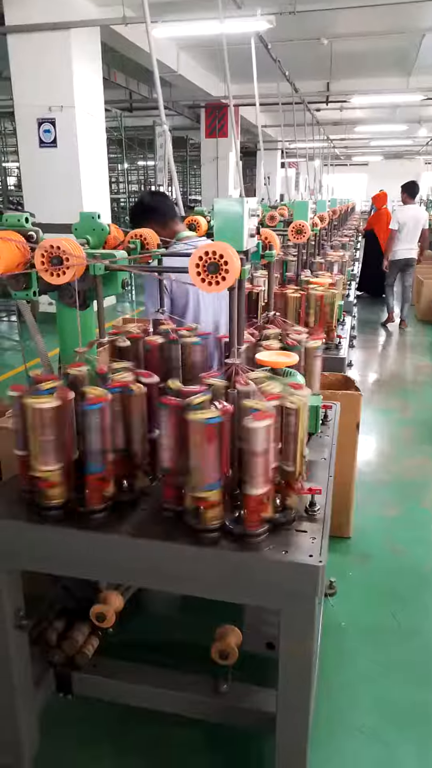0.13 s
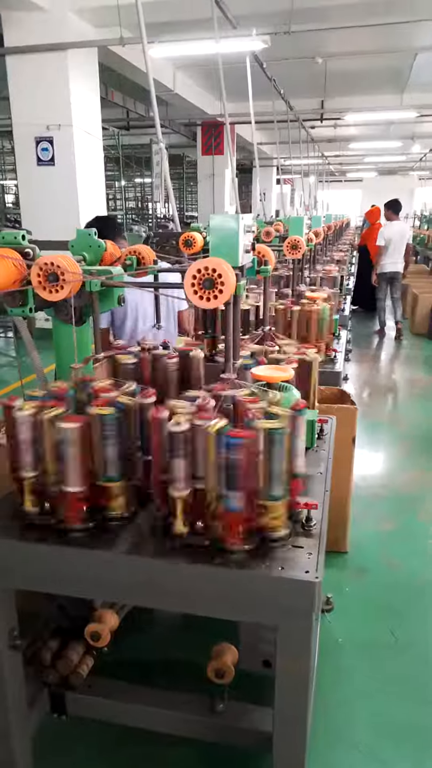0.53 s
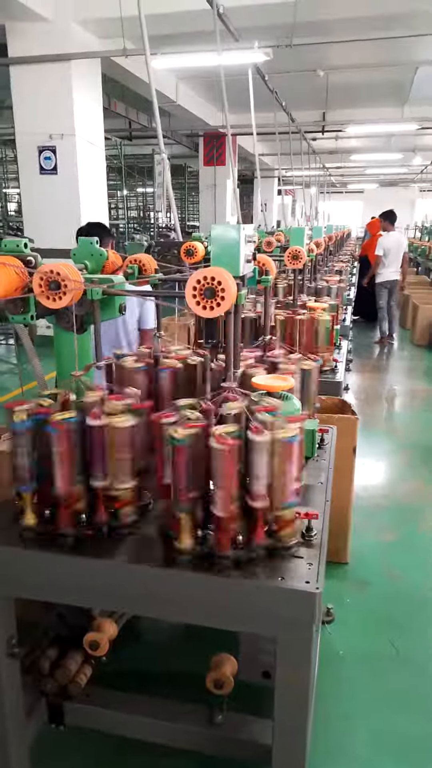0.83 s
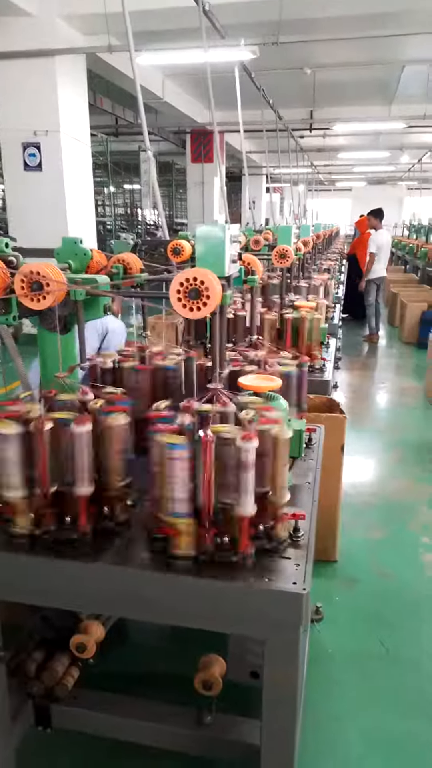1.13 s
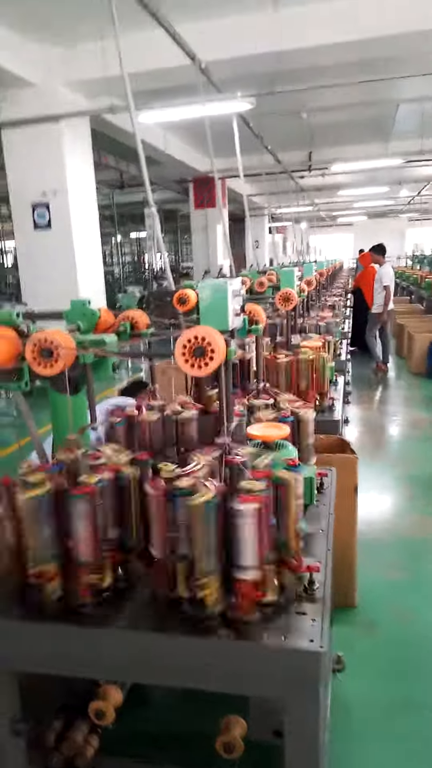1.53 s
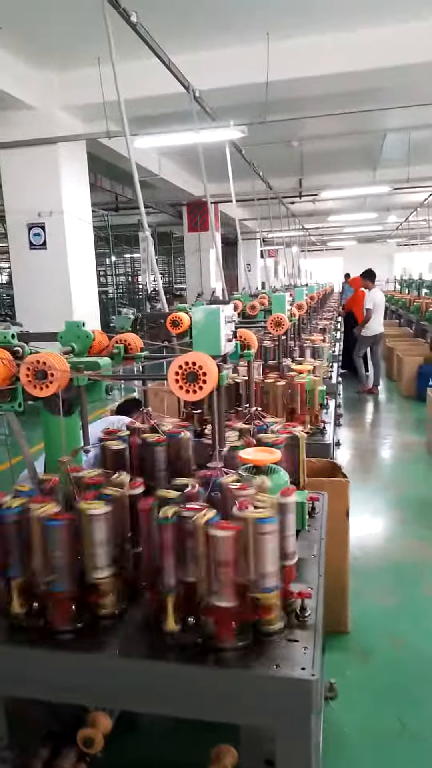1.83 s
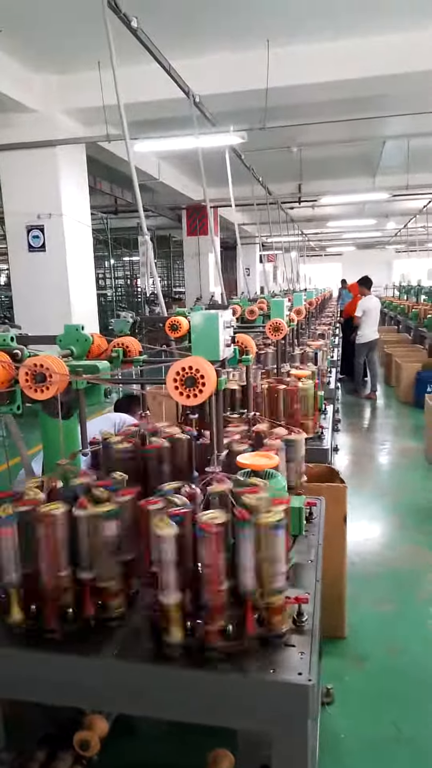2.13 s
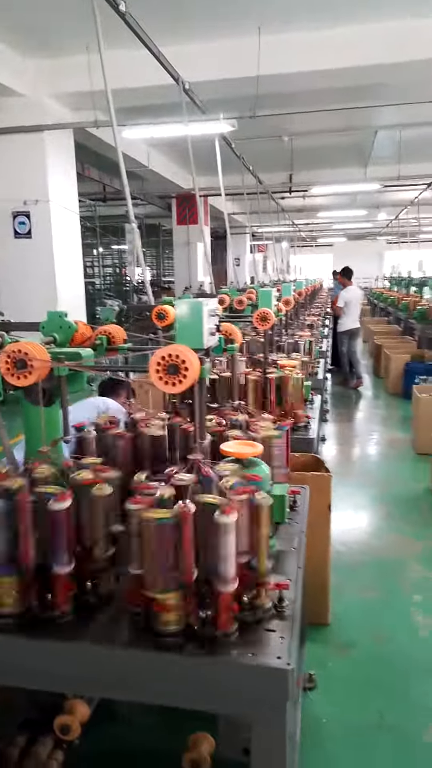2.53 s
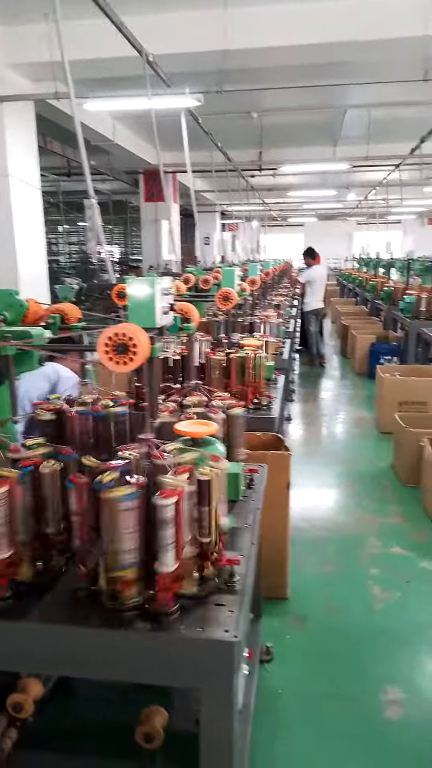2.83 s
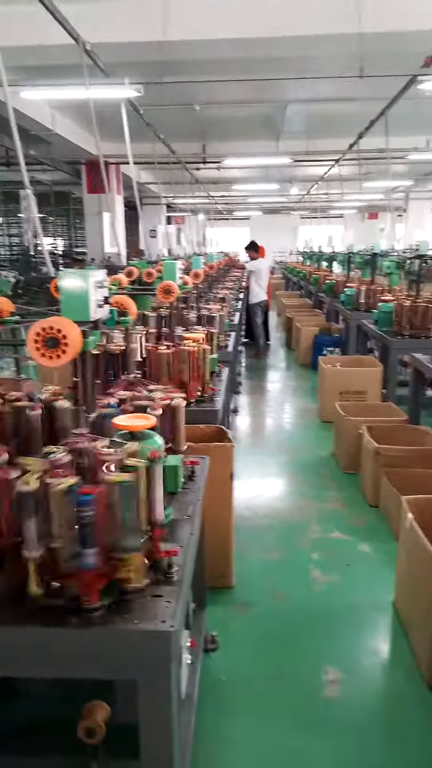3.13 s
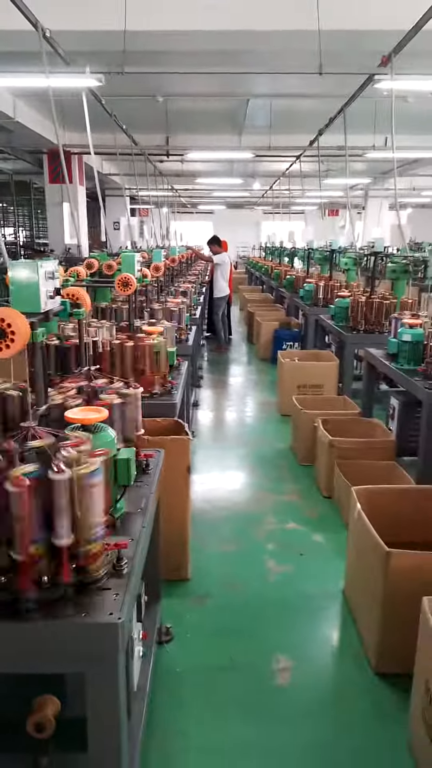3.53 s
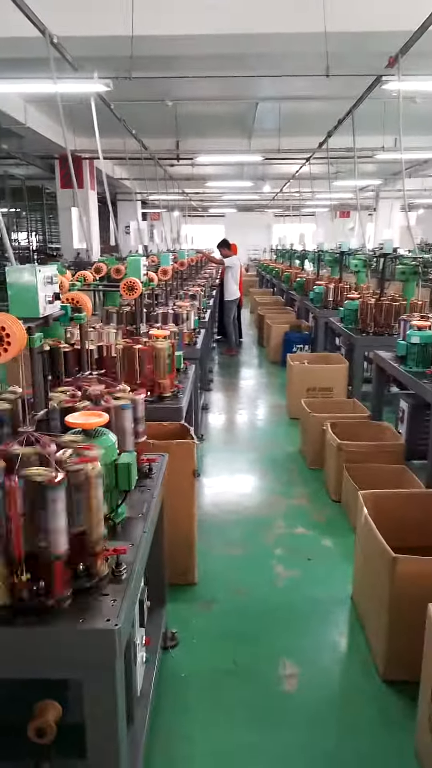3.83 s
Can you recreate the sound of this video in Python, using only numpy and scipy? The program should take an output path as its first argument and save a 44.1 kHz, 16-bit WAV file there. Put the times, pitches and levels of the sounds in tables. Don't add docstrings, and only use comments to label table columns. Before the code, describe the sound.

Braiding machines run in dense steady noise, with whirring gears and rapid metallic bobbin clatter

```python
import sys
import numpy as np
from scipy import signal
from scipy.fft import rfft, irfft
from scipy.io import wavfile
from scipy.ndimage import uniform_filter1d

SR = 44100
rng = np.random.default_rng(int(sys.argv[2]) if len(sys.argv) > 2 else 0)


def file_out(sig):
    cols = np.atleast_2d(sig).T
    lim = np.clip(cols, -1, 1)
    pcm = np.round(lim * 32767).astype(np.int16)
    wavfile.write(sys.argv[1], SR, pcm)


def natural_amplitude(level_db):
    exponent = np.asarray(level_db, float) / 20
    return 10 ** exponent


N = 176400
PORT_GAP_M, SOUND_SPEED = 0.2, 343
EDGE_HZ = 14250


def evened(x):
    return x / np.sqrt(np.mean(x ** 2) + 1e-20)


def read(points, hz):
    f, value = np.transpose(points)
    return np.interp(np.log(hz + 1), np.log(f + 1), value)


def slow(t, top_hz):
    f, phase = np.geomspace(.2, top_hz, 20), rng.random(20)
    coarse = np.linspace(0, N / SR, 400)
    sines = np.sin(2 * np.pi * (f[:, None] * coarse + phase[:, None]))
    drift = evened((sines / np.sqrt(f[:, None])).sum(0))
    return np.interp(t, coarse, drift)


# (frequency [Hz], level [dB])
ROAR_LOW_COLOUR = [(12, -66), (60, -40), (110, -25), (160, -36.5), (200, -23), (290, -6.5), (520, -8.5),
                   (1000, -12)]
# (frequency [Hz], level [dB])
ROAR_HIGH_COLOUR = [(1000, 0.6), (1400, -2.5), (2200, -0.26), (3000, -5.5), (5000, -3.5), (9000, -5.5),
                    (13000, -9), (14300, -8.5)]
ROAR_DB, PATCH_DB, SWELL_DB = -23, 0.5, 0.02


def roar():
    frames, hz = N // 512 + 5, np.fft.rfftfreq(2048, 1 / SR)
    a, b, c, d, patches = rng.standard_normal((frames, 1025, 5)).T
    patches = uniform_filter1d(patches, size=20, axis=0)
    patches = evened(uniform_filter1d(patches, size=6, axis=1))
    coherence = 1.01 * np.sinc(2 * hz * PORT_GAP_M / SOUND_SPEED)[:, None]
    coherence = np.clip(coherence, -1, 1)
    left, other = a + 1j * b, c + 1j * d
    right = coherence * left + np.sqrt(1 - coherence ** 2) * other
    colour_db = read(ROAR_LOW_COLOUR, hz) + read(ROAR_HIGH_COLOUR, hz)
    swell_db = SWELL_DB * slow(np.arange(frames) * 512 / SR, 8.3)
    spectra = np.array([left, right]) * natural_amplitude(colour_db[:, None] + PATCH_DB * patches + swell_db)
    noise = signal.istft(spectra, nperseg=2048, noverlap=1536)[1][:, :N]
    return natural_amplitude(ROAR_DB) * evened(noise)


HUM_TONE_HZ = [299.6, 95.8, 191.6, 383.2, 479]
# (level [dB], waver [dB])
HUM_LEVELS = [(-34, 1.), (-67, 4.5), (-57, 3), (-45.5, 3.5), (-55, 2.5)]


def hum():
    t = np.arange(N) / SR
    tones = np.zeros(N)
    for hz, (db, waver_db) in zip(HUM_TONE_HZ, HUM_LEVELS):
        level = np.sqrt(2) * natural_amplitude(db + waver_db * slow(t, 20))
        tones += level * np.sin(2 * np.pi * (hz * t + rng.random()))
    return np.array([tones, tones])


# (tooth rate [Hz], starting phase [turns])
MESH_RATES = [(341.5, .6), (345.5, 0), (347.79, .21), (350.5, .4)]
MESH_DB = [-44.5, -40, -40, -47.5]
# (multiple of the tooth rate, left level [dB], right level [dB])
MESH_HARMONICS = [(1, -3, -5.5), (2, -8, -0.5), (3, -18, -7.5)]
MESH_WAVER_DB, SPEED_WANDER = 1.5, .0002


def gears():
    t, out = np.arange(N) / SR, np.zeros((2, N))
    for (hz, start), db in zip(MESH_RATES, MESH_DB):
        turns = start + np.cumsum(hz * (1 + SPEED_WANDER * slow(t, 3))) / SR
        for k, left_db, right_db in MESH_HARMONICS:
            lag = rng.uniform(-1.06, 1) * k * hz * PORT_GAP_M / SOUND_SPEED
            level = np.sqrt(2) * natural_amplitude(db + MESH_WAVER_DB * slow(t, 7.3))
            out[0] += level * natural_amplitude(left_db) * np.sin(2 * np.pi * k * turns)
            out[1] += level * natural_amplitude(right_db) * np.sin(2 * np.pi * (k * turns + lag))
    return out


# (time [s], level [dB])
NEAR_ROW = [
    (0.4, 9.5),
    (1, -18),
    (1.6, -2),
    (2.2, -3.5),
    (2.8, -12),
    (3.4, -12),
    (4, -14),
]
PASS_HZ, BEAT = 9.3, 0.9
TICKS_PER_S, TICK_SPREAD_DB, CLATTER_DB = 1200, 4.5, -35
TICK_LO_HZ, TICK_HI_HZ, TICK_CYCLES = 1815, 13300, 11
TICK_TAIL_S, TAIL_DB = 0.15, -10


def clatter():
    t = np.arange(N) / SR
    density = 1 + BEAT * np.cos(2 * np.pi * (PASS_HZ * t + 0.045 * slow(t, 2.3)))
    size_draw, hit_draw, kind_draw = rng.random((3, 2, N))
    size_db = TICK_SPREAD_DB * np.minimum(-np.log(size_draw + 1e-9), 3.5)
    strikes = natural_amplitude(size_db) * (hit_draw < density * TICKS_PER_S / SR)

    modes_hz = np.geomspace(TICK_LO_HZ, TICK_HI_HZ, 12)
    kind = (kind_draw * len(modes_hz)).astype(int)
    u, ticks = np.arange(512) / SR, np.zeros((2, N))
    for k, hz in enumerate(modes_hz):
        decay = np.exp(-3 * u * hz / TICK_CYCLES)
        tick = np.sqrt(hz) * decay * np.sin(2 * np.pi * hz * u)
        ticks += signal.oaconvolve(strikes * (kind == k), tick[None], axes=1)[:, :N]

    u = np.arange(4096) / SR
    tail = rng.standard_normal((2, len(u))) * natural_amplitude(-60 * u / TICK_TAIL_S)
    wet = signal.oaconvolve(ticks, tail, axes=1)[:, :N]
    near_db = np.interp(t, *np.transpose(NEAR_ROW))
    return natural_amplitude(CLATTER_DB + near_db) * evened(evened(ticks) + natural_amplitude(TAIL_DB) * evened(wet))


def scene():
    return roar() + hum() + gears() + clatter()


# (resonance [Hz], quality, trim [dB], damping above resonance [dB/kHz])
PORT_CAVITIES = [(7190, 6.84, 2, -0.77), (10630, 7.5, 1, 1)]


def through_ports(x):
    hz = np.fft.rfftfreq(N, 1 / SR)
    responses = []
    for f, q, db, damp_db in PORT_CAVITIES:
        resonance = 1 / (1 - (hz / f) ** 2 + 1j * hz / f / q)
        responses.append(resonance * natural_amplitude(db - damp_db * np.maximum(hz - f, 0) / 1000))
    band = (hz > 15) * np.clip((EDGE_HZ - hz) / 60 + .5, 0, 1)
    return irfft(rfft(x) * np.array(responses) * band, N)


# (frequency [Hz], level [dB])
MUTE_THRESHOLD = [(2300, -20), (5000, -12), (8000, -10.5), (10500, -12.5), (12000, -13.8), (13000, -15),
                  (13600, -17), (14300, -17)]
MUTE_WANDER_DB = .5


def muted(x):
    hz, t, z = signal.stft(x, SR, "cosine", nperseg=2048, noverlap=1024)
    power = uniform_filter1d(abs(z) ** 2, size=9, axis=1)
    power = uniform_filter1d(power, size=3, axis=2)
    mean = power[:, hz < EDGE_HZ].mean((0, 1)) * natural_amplitude(2 * MUTE_WANDER_DB * slow(t, 16))
    threshold = mean * natural_amplitude(2 * read(MUTE_THRESHOLD, hz))[:, None]
    keep = (power > threshold) | (hz < 2000)[:, None]
    return signal.istft(z * keep, SR, "cosine", nperseg=2048, noverlap=1024)[1][:, :N]


FADE_START_S, FADE_STEP_S, FADE_END_S, FADE_STEP_DB = .406, .62, .67, -2


def fade_in():
    t = np.arange(N) / SR
    rise = np.clip((t - FADE_START_S) / (FADE_END_S - FADE_START_S), 0, 1)
    held = np.clip((FADE_END_S - t) / (FADE_END_S - FADE_STEP_S), 0, 1)
    return rise * natural_amplitude(FADE_STEP_DB * held)


def top_cut(x):
    return signal.sosfilt(signal.butter(12, 14300, fs=SR, output="sos"), x)


def record(dry):
    mix = muted(through_ports(dry)) * fade_in()
    return top_cut(mix)


dry = scene()
out = record(dry)
file_out(out)
```